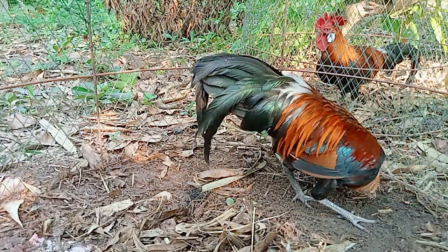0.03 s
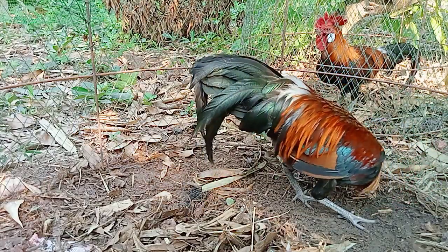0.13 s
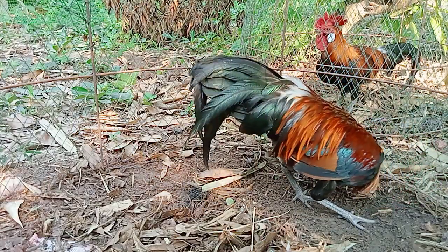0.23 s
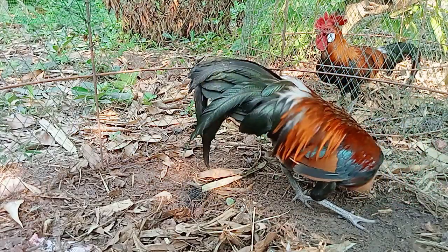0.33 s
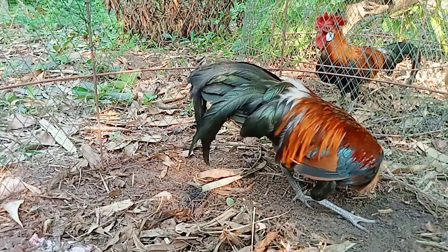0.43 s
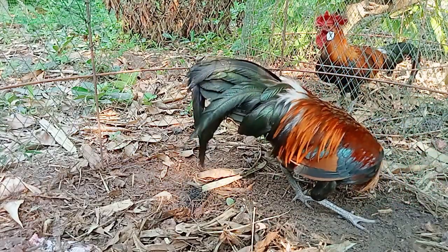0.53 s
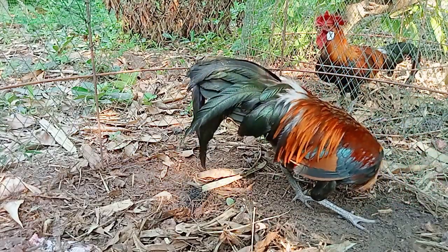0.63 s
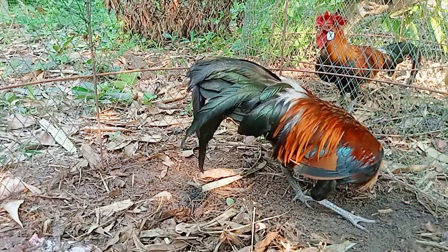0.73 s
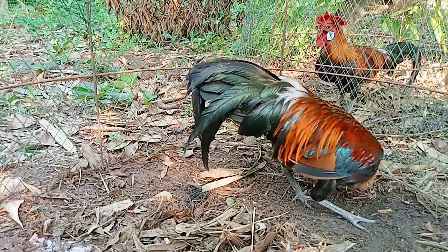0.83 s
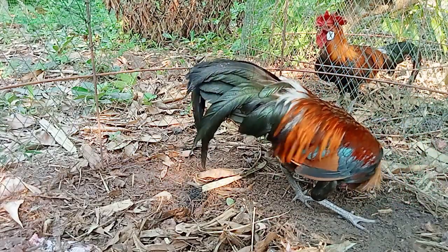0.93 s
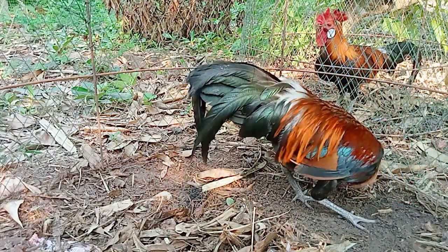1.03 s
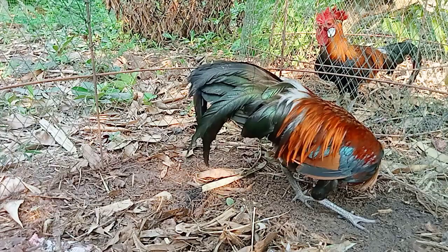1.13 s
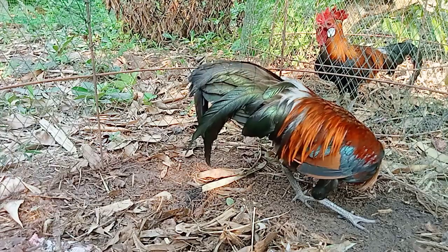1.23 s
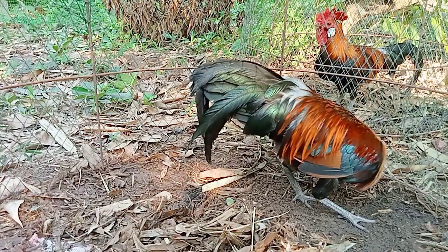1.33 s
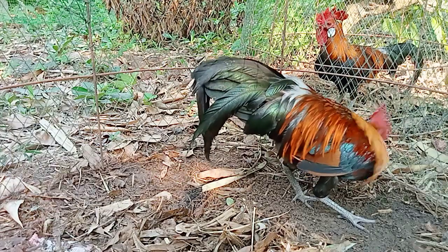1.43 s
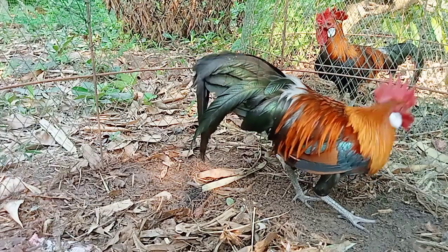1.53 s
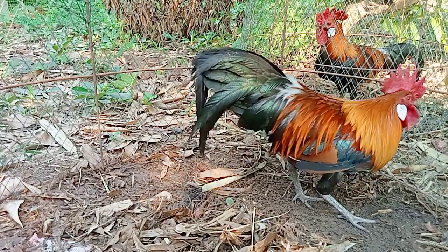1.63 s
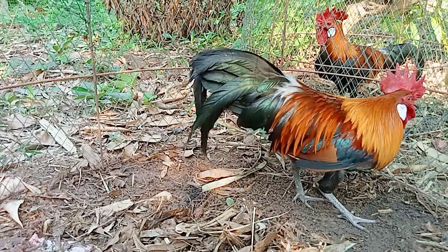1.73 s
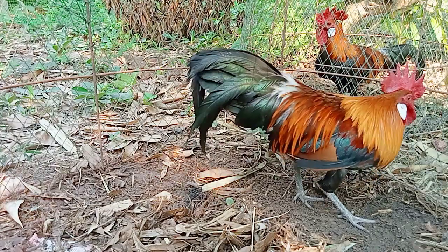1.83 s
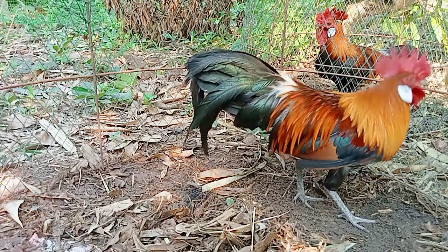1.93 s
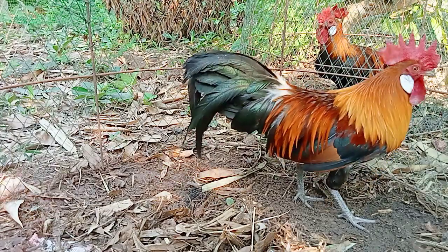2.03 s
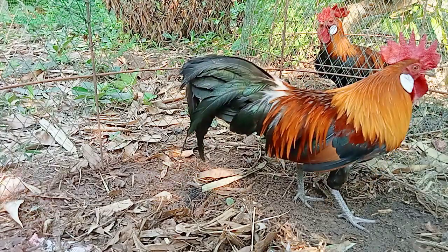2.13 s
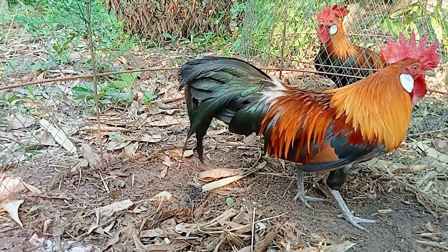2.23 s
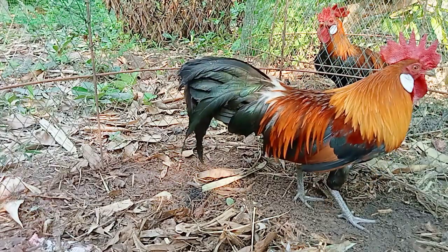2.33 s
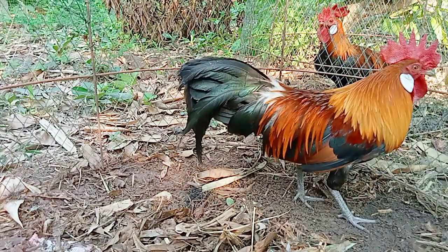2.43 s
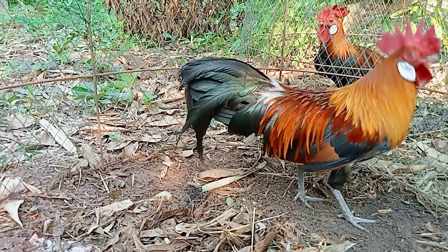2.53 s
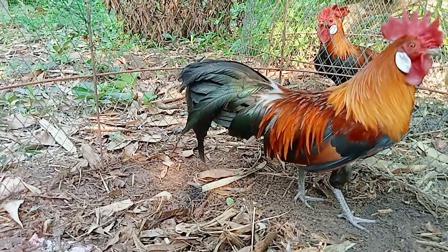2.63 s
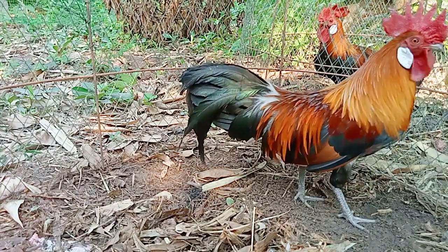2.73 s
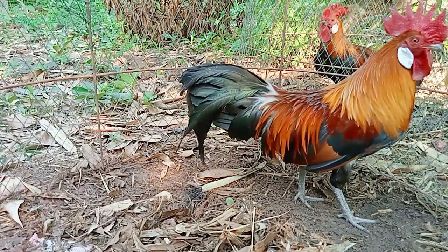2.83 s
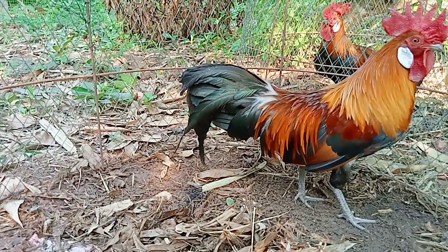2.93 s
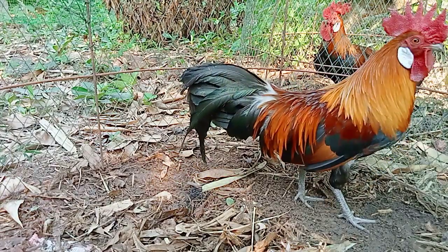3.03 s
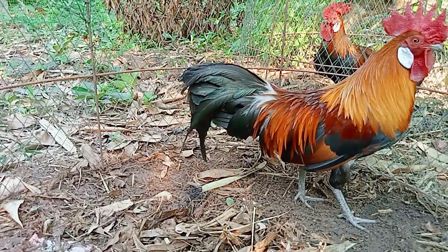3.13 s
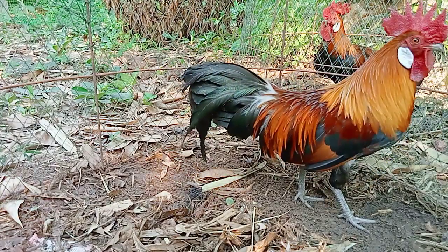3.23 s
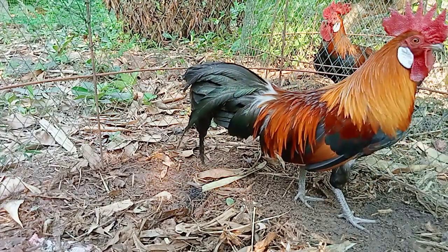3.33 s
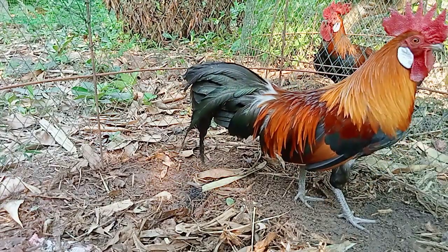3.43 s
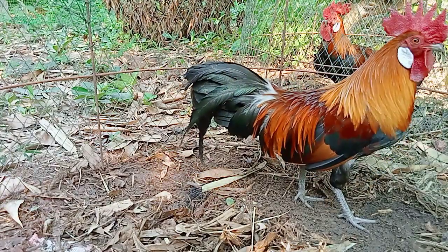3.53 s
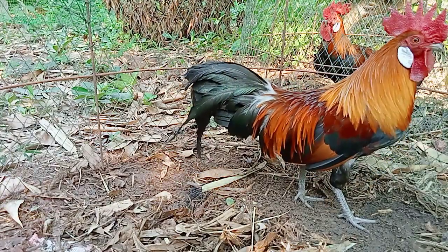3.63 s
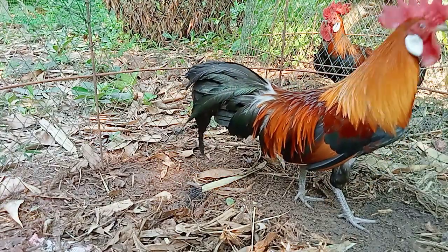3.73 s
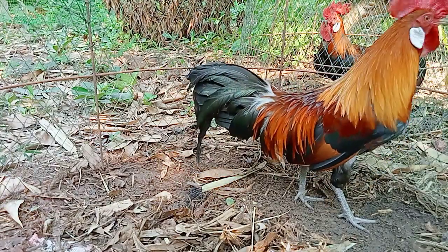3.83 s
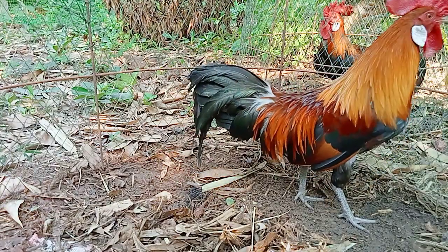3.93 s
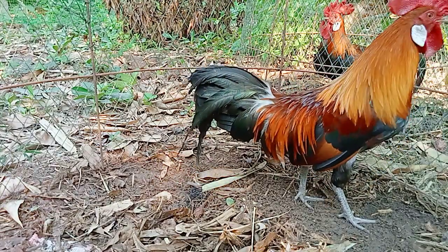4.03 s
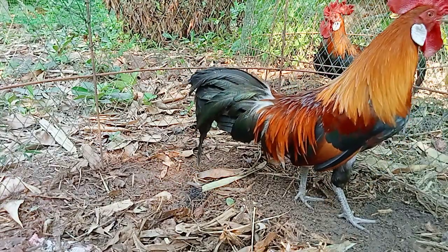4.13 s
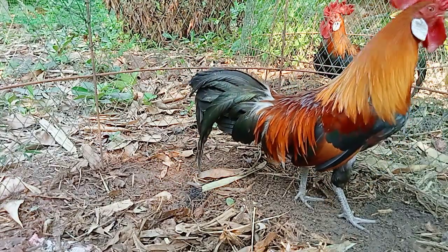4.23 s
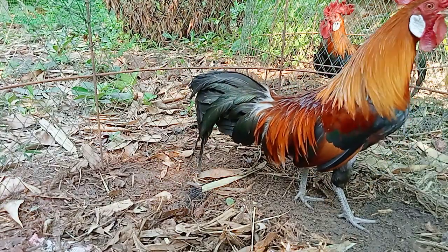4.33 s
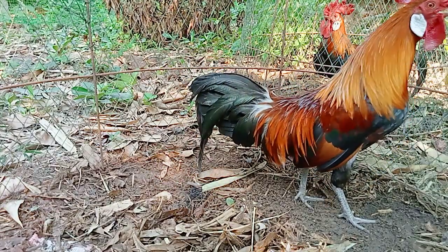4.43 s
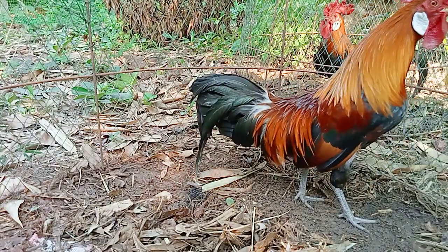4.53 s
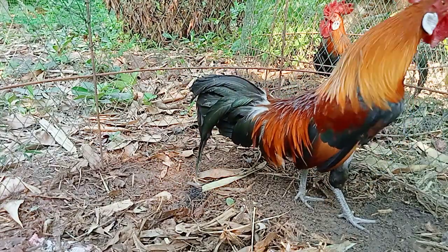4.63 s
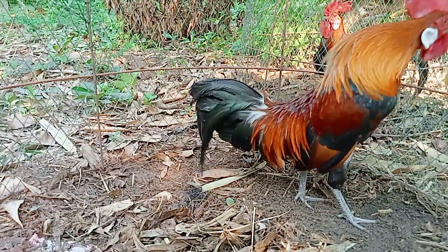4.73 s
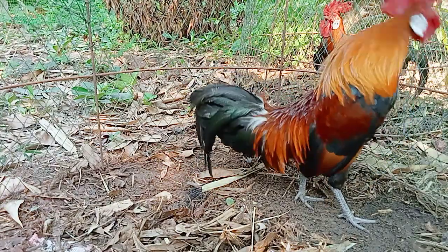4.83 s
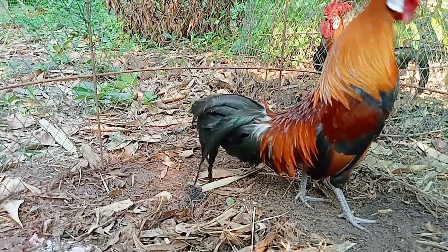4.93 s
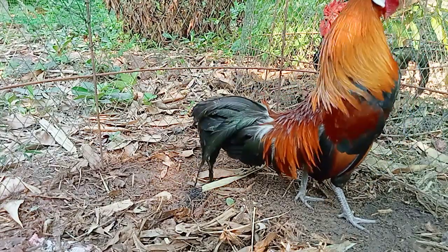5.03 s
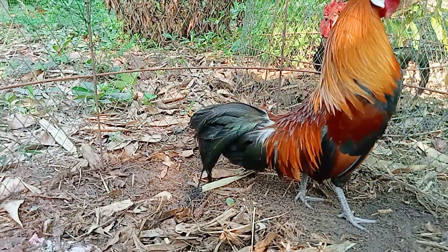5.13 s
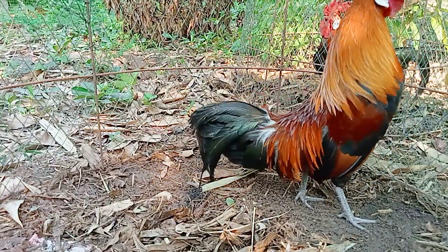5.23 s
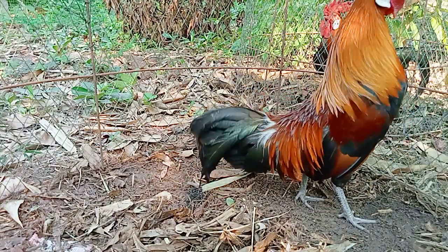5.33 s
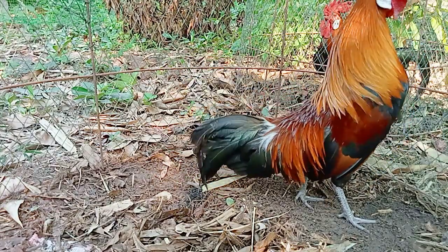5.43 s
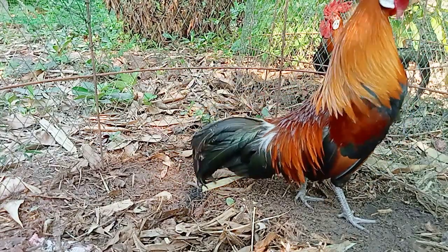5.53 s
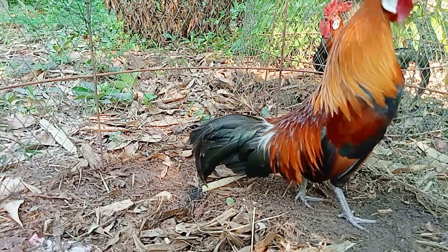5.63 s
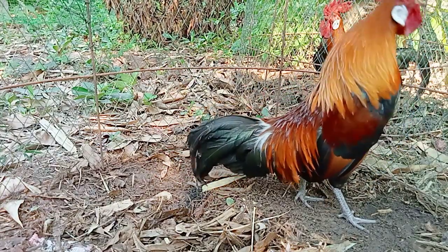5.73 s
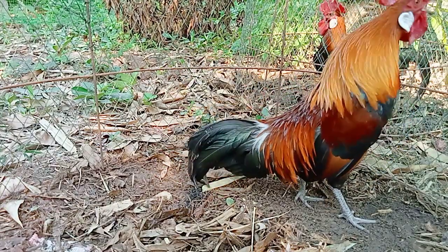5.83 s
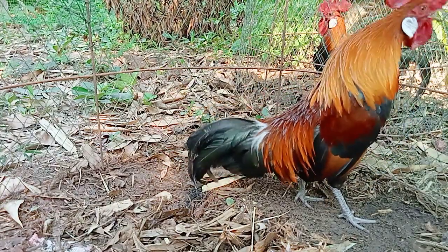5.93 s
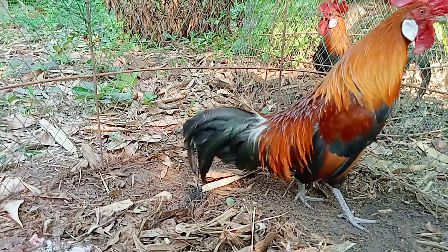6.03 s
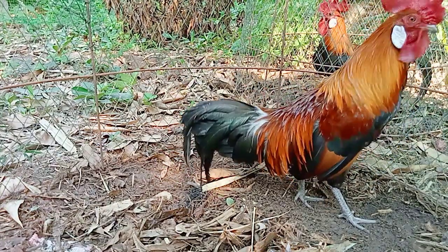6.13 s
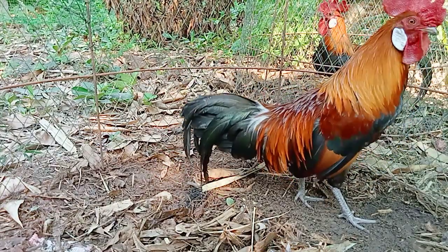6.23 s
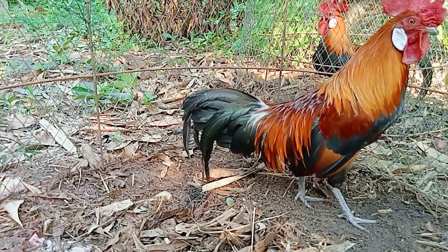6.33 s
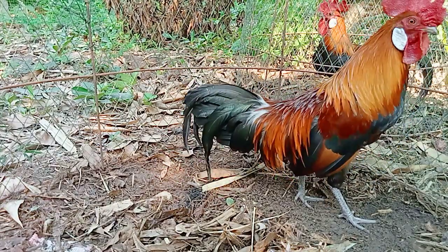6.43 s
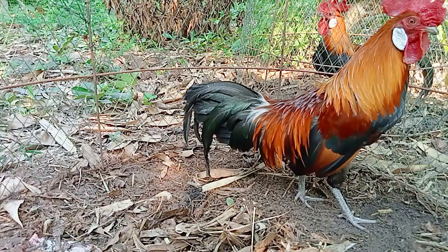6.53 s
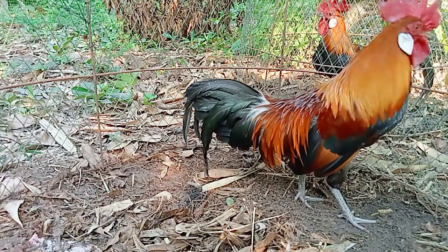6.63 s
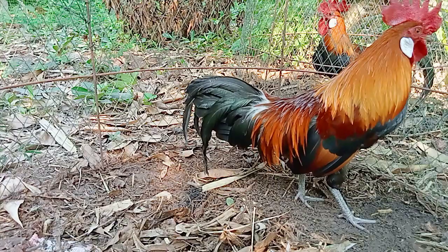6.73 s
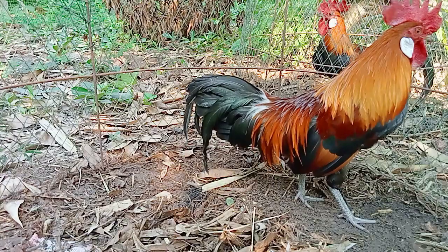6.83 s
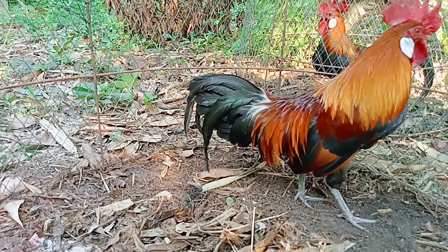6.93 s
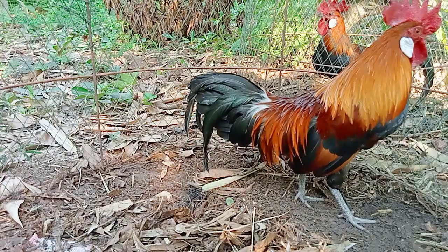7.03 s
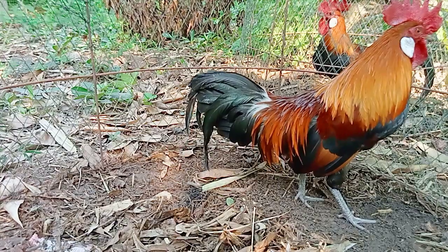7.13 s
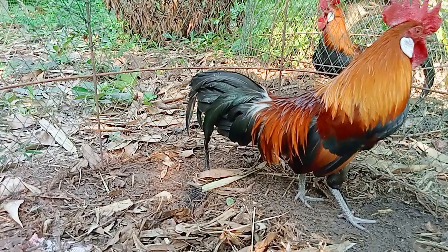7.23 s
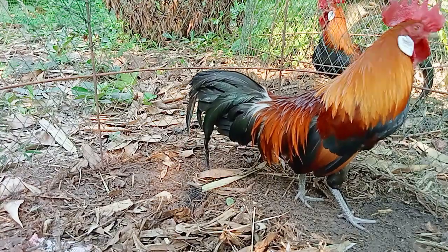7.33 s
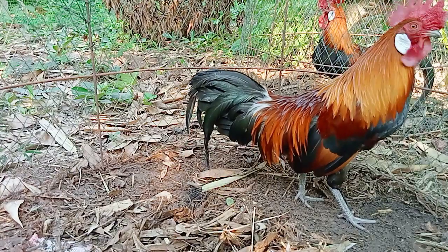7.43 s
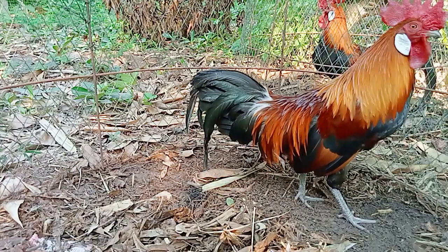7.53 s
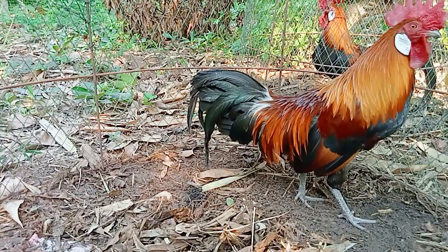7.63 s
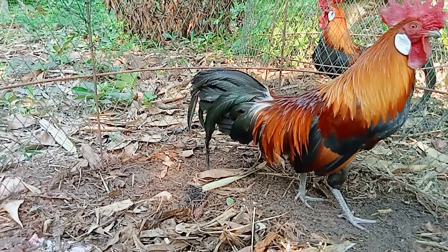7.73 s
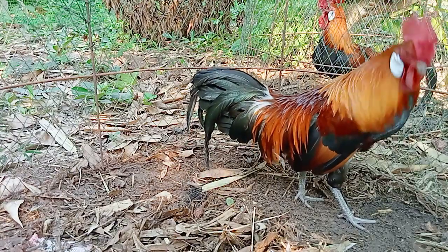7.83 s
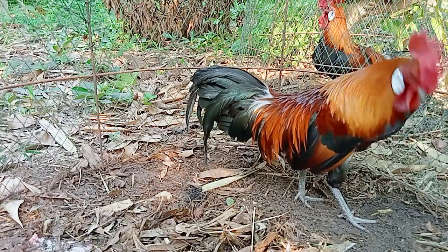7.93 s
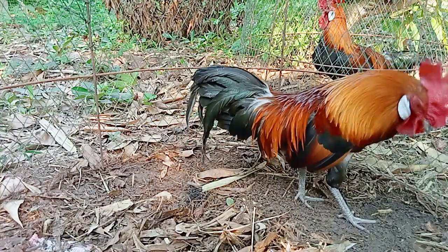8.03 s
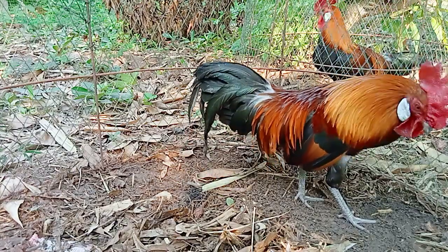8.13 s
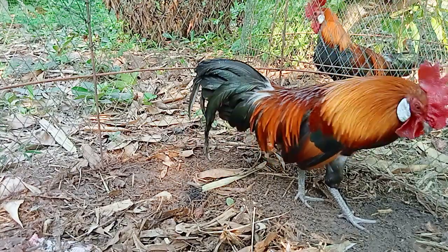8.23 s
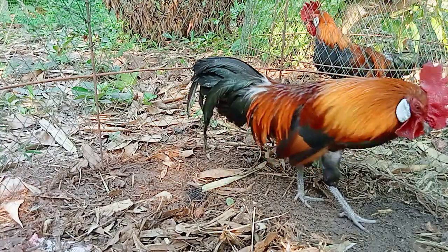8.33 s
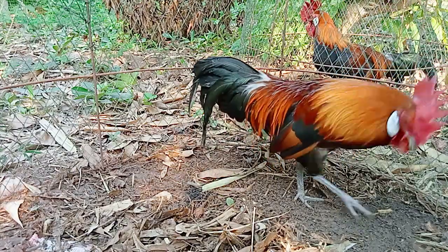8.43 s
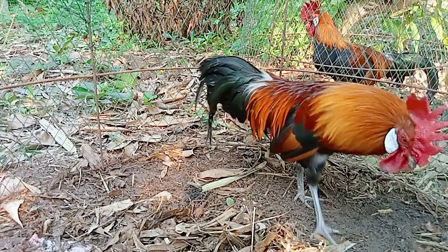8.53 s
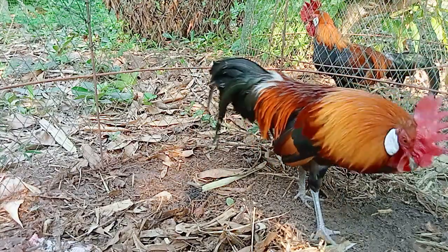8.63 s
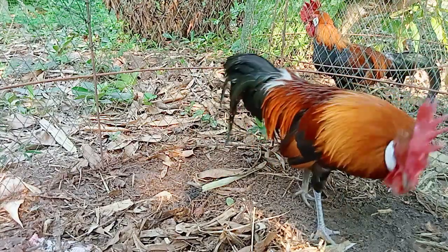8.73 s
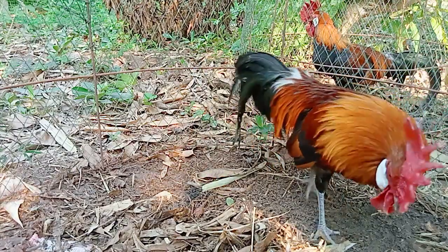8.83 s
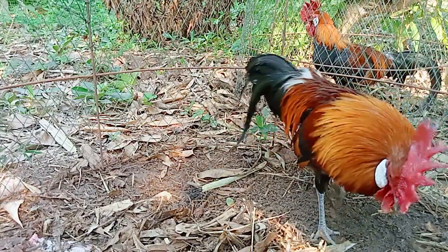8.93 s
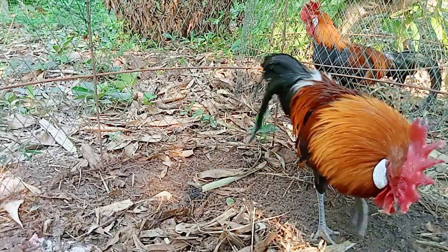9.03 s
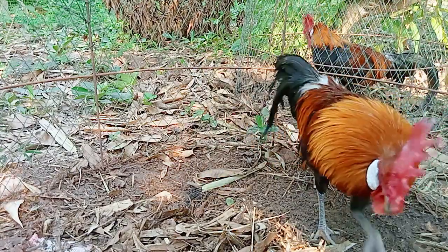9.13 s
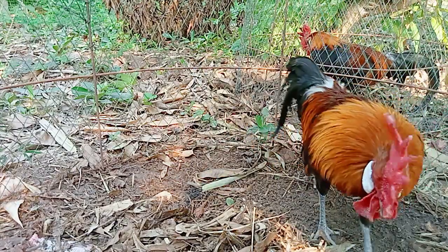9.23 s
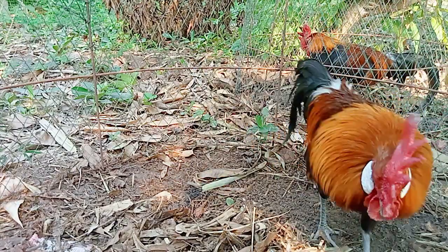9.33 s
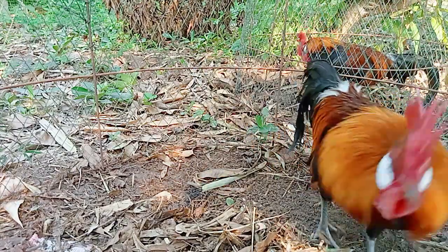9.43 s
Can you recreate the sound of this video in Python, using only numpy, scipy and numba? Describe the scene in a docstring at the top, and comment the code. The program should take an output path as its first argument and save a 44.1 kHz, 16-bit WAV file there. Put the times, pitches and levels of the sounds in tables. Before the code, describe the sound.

A faint, high insect hiss and a low murmur of open air run throughout in a small outdoor pen. For the first four and a half seconds, a light breeze rumbles and bumps softly on the microphone. From about 1.2 to 4.1 seconds, a chicken further off gives one drawn-out nasal note, then a quick, even run of short ones. At about 4.9 seconds a rooster crows once, close and much louder than everything else, in four clipped, raspy notes, the last dropping away at about 6.1 seconds. Soft, scattered clucks follow, with three higher, falling whines between 7.7 and 8.5 seconds. A small bird gives faint, high, falling chirps at around 6.1, 6.8, 7.3 and 9.2 seconds. Dry leaves tick lightly near 1.9, 3.3 and 7 seconds. One last quiet cluck comes at about 9.3 seconds.

```python
"""A small garden pen, where a bantam rooster crows once, in four notes, close to a phone.
Two flapping membranes make his voice, and it rings in his windpipe, mouth and beak.
Before and after, a fowl further off whines and clucks softly; a small bird chirps and dry leaves tick.
Insects hiss, a breeze bumps the microphone, and the phone turns it all down during the crow."""
import sys
import numpy as np
from scipy import signal
from scipy.fft import rfft, irfft, next_fast_len
from scipy.io import wavfile
from scipy.ndimage import uniform_filter1d, minimum_filter1d, map_coordinates
from numba import njit

SR = 44100
rng = np.random.default_rng(int(sys.argv[2]) if len(sys.argv) > 2 else 0)


def dump_mix(stems):
    """Bounce the given channels to the path in sys.argv[1] as a 16-bit WAV at rate SR."""
    frames = np.atleast_2d(stems).T  # one column per channel
    limited = np.clip(frames, -1, 1)  # hard clip at full scale
    pcm = np.round(limited * 32767).astype(np.int16)
    wavfile.write(sys.argv[1], SR, pcm)


N = 418068
T = np.arange(N) / SR


def undb(db):
    """Turn decibels into a number to multiply by."""
    return 10 ** (np.asarray(db) / 20)


def unit(x):
    """Scale a sound to an average (rms) level of 1."""
    return x / np.sqrt(np.mean(x ** 2) + 1e-18)


def colour(x, points):
    """Filter a sound along a curve of (frequency [Hz], gain [dB]) points."""
    size = next_fast_len(len(x) + 4096)
    size += size % 2
    hz, db = np.transpose(points)
    bin_hz = np.arange(size // 2 + 1) * SR / size
    gain = undb(np.interp(np.log(bin_hz + 1), np.log(hz), db))
    # make the filter ring only after a sound, never before it
    cepstrum = irfft(np.log(gain))
    cepstrum[1:size // 2] *= 2
    cepstrum[size // 2 + 1:] = 0
    return irfft(rfft(x, size) * np.exp(rfft(cepstrum)))[:len(x)]


def noise(points, size=N):
    """Noise at level 1, filtered along the given curve."""
    return unit(colour(rng.standard_normal(size), points))


def wander(rate, size=N):
    """A smooth random wiggle, roughly 1 either way, that changes `rate` times a second."""
    return map_coordinates(rng.standard_normal(8192), [np.arange(size) * rate / SR], order=3, mode="wrap")


def step(t, width):
    """A smooth change from 0 to 1 around t = 0."""
    return .5 + .5 * np.tanh(t / width)


def add(out, start, sound):
    """Mix a sound in at `start` seconds."""
    i = max(int(start * SR), 0)
    out[i:i + len(sound)] += sound[:max(N - i, 0)]


def resonate(source, points):
    """Let a sound ring in a hollow space, and hold its level at 1."""
    sound = colour(source, points)
    return sound / np.sqrt(np.abs(uniform_filter1d(sound ** 2, size=600)) + 1e-12)


def insects_and_air(flicker_db, air_db):
    """A steady high hiss of insects over the low murmur of open air."""
    # loudness of the insects: (time [s], level [dB])
    hiss_levels = [(0, -42), (1.4, -38), (3.1, -40), (4.0, -39.5), (4.8, -42), (6.6, -45.5), (8.5, -46.5),
                   (9.48, -44.5)]
    # tone of the insects and of the air: (frequency [Hz], gain [dB])
    hiss_tone = [(30, -64.5), (300, -16.5), (1000, -15), (2200, -14.5), (3500, -10), (5000, -8), (6000, -7),
                 (7150, 1), (7700, -4), (8400, -14), (10000, -19.5), (12000, -22.5), (14000, -18),
                 (15500, -13)]
    air_tone = [(15, -41.5), (35, -27), (60, -1.5), (125, 3.5), (330, -4), (680, -2), (1200, -8.5),
                (2500, -8.5), (5000, -49.5)]
    hiss = noise(hiss_tone) * undb(np.interp(T, *np.transpose(hiss_levels)) + flicker_db * wander(45))
    return hiss + noise(air_tone) * undb(air_db + .25 * wander(11))


def breeze(gust_db, thud_s):
    """Swirling air rumbles on the microphone; the strongest swirls land as soft thuds."""
    # strength of the breeze, which dies before the crow: (time [s], level [dB])
    strength = [(0, -57), (.55, -55.5), (1.0, -43.5), (1.4, -49.5), (2.7, -48.5), (3.55, -39), (3.9, -59),
                (4.45, -47.5), (4.72, -68)]
    # tone of the rumble: (frequency [Hz], gain [dB])
    rumble_tone = [(15, -57), (35, -14), (60, 1), (85, 5.5), (120, 1.5), (185, -13), (260, -26), (600, -26),
                   (1000, -42), (2000, -86.5)]
    # bumps of air: (time [s], peak level [dB])
    bumps = [(0.074, -36.5), (0.373, -36), (0.697, -29), (0.74, -32.5), (0.823, -34.5), (1.044, -33),
             (1.108, -33), (1.567, -34), (1.709, -38), (2.035, -43), (2.287, -39), (2.59, -36),
             (2.665, -26.5), (3.122, -35), (3.257, -36), (3.316, -34), (3.509, -44), (3.59, -33),
             (3.684, -28.5), (3.878, -32.5), (4.154, -34)]
    swirls = unit(noise(rumble_tone) * undb(gust_db * wander(35)))
    out = swirls * undb(np.interp(T, *np.transpose(strength), right=-90))
    t = T[:SR // 8]
    for start, peak_db in bumps:
        thud = noise(rumble_tone, len(t)) * t * np.exp(-t / thud_s)
        add(out, start, thud / np.abs(thud).max() * undb(peak_db))
    return out


def leaves(decay_s):
    """Dry leaves snap under the birds' feet in tiny bright cracks."""
    # each snap: (time [s], level [dB])
    ticks = [(1.8854, -49.5), (1.914, -54.5), (3.3049, -40), (3.3857, -47.5), (6.768, -40.5), (7.046, -42)]
    snap_tone = [(600, -10), (2500, 3), (7000, 28), (9000, 10), (15000, -28)]
    out, t = np.zeros(N), T[:SR // 10]
    for start, db in ticks:
        add(out, start, undb(db) * np.exp(-t / decay_s) * noise(snap_tone, len(t)))
    return out


def yard_echo(x, near_db, near_s, far_db, far_fade_s):
    """Sound bounces quickly off ground and fence, then faintly off the trees."""
    t = T[:SR]
    tree_tone = [(300, -9.5), (1000, -2.5), (2150, -1.5), (2700, -4),
                 (3500, 4.5), (5000, -10), (8000, -7), (15000, -3.5)]
    near = rng.standard_normal(len(t)) * np.exp(-t / near_s) * (t > .003)
    far = noise(tree_tone, len(t)) * undb(-60 * t / far_fade_s) * (t > .02)
    echo = (undb(near_db) * unit(near) + undb(far_db) * unit(far)) / np.sqrt(len(t))
    return x + signal.fftconvolve(x, echo)[:N]


def peeps(calls, waver):
    """Short, soft calls, each one wavering tone that slides in pitch."""
    out = np.zeros(N)
    for start, length, from_hz, to_hz, db in calls:
        size = int(length * SR)
        hz = np.linspace(from_hz, to_hz, size) * (1 + waver * wander(330, size))
        tone = np.sin(2 * np.pi * np.cumsum(hz) / SR)
        add(out, start, undb(db) * unit(tone * np.sin(np.linspace(0, np.pi, size))))
    return out


def small_bird():
    """A small bird in the trees gives high, falling chirps."""
    # each chirp: (time [s], length [s], start pitch [Hz], end pitch [Hz], level [dB])
    chirps = [(6.11, .14, 3880, 3400, -56.5), (6.80, 0.13, 3930, 3590, -54.5),
              (7.25, 0.11, 3860, 3440, -54), (9.22, 0.12, 4020, 3530, -50.5)]
    return peeps(chirps, waver=.04)


def fowl_clucks():
    """The other fowl clucks and grunts softly."""
    # each cluck: (time [s], length [s], start pitch [Hz], end pitch [Hz], level [dB])
    clucks = [(1.08, 0.23, 1530, 1724, -57), (1.37, 0.036, 504, 670, -53.5), (4.57, 0.044, 570, 474, -52.5),
              (4.67, 0.11, 736, 1033, -55.5), (6.025, 0.049, 620.5, 221, -46.5),
              (6.52, 0.12, 1290, 1368, -51.5), (7.39, 0.043, 515, 464, -57), (7.51, 0.101, 1576, 1480, -52),
              (7.985, 0.036, 593, 386, -54.5), (8.39, 0.037, 635, 350, -50.5), (9.34, 0.028, 562, 427, -52)]
    return peeps(clucks, waver=.12)


def voice_box(hz, rough, jitter, jitter_rate, shimmer_db, half_db, slack_db, waver_db, rasp):
    """Two membranes flap in a bird's breath; roughness shakes their pitch (jitter) and level (shimmer)."""
    size = len(hz)
    # each upper overtone slowly swells and fades on its own
    weights = [undb(waver_db * (k > 2) * wander(9, size)) for k in range(1, 19)]

    def membrane(hz):
        """One membrane chops the breath into pulses."""
        stray = jitter * rough * (wander(jitter_rate, size) + .7 * wander(5 * jitter_rate, size))
        phase = 2 * np.pi * np.cumsum(hz * (1 + stray)) / SR
        pulses = sum(w * np.cos(k * phase) * (k * hz < SR / 2) for k, w in enumerate(weights, 1))
        # every other flap differs, which adds tones halfway between the overtones
        pulses *= 1 + undb(half_db) * np.cos(phase / 2)
        pulses *= undb(shimmer_db * rough * wander(400, size))
        # air tears through once a flap
        return pulses + rasp * (rough + .02) * (1 + np.cos(phase)) * rng.standard_normal(size)

    tight_hz = hz * (1 + .03 * rough)
    # the tight and the slack membrane take turns, about 45 times a second: the rattle
    turns = np.cumsum(45 * (1 + .4 * wander(40, size))) / SR
    tight = undb(7 * rough * np.sin(2 * np.pi * turns))
    slack = undb(slack_db) * rough / tight
    return (tight * membrane(tight_hz) + slack * membrane(.86 * tight_hz)) / np.hypot(tight, slack)


def nasal_notes(calls, rises, throat, scoop, sag, rough, flutter_db):
    """Thin notes that scoop up to their pitch and sag; a slow rise starts lower and more softly."""
    out = np.zeros(N)
    for (start, length, top_hz, db), rise_s in zip(calls, rises):
        t = np.arange(0, length, 1 / SR)
        climb = np.minimum(t / rise_s, 1)
        hz = top_hz * (1 - scoop * np.sqrt(rise_s) * (1 - climb) ** 2) * (1 - sag * (t / length) ** 3)
        fade_in = np.minimum(climb / .3, 1) * (.6 + .4 * climb)
        fade_out = np.clip((length - t) / .036, 0, 1) * (1 - .5 * (t / length) ** 2)
        buzz = voice_box(hz, rough, jitter=.055, jitter_rate=260, shimmer_db=6,
                         half_db=-20, slack_db=-10, waver_db=3, rasp=1.3)
        level = undb(db + flutter_db * wander(163.6, len(t)))
        add(out, start, resonate(buzz, throat) * fade_in * fade_out * level)
    return out


def fowl_whines():
    """The other fowl pleads before the crow and whines higher after it."""
    # its notes: (time [s], length [s], top pitch [Hz], level [dB])
    pleads = [(1.222, 0.61, 913, -38.5), (1.866, 0.2, 890, -39.5), (2.074, .16, 901, -37),
              (2.238, 0.15, 928, -38.5), (2.409, .16, 927, -39), (2.576, 0.15, 895, -40),
              (2.738, 0.15, 939, -41), (2.896, 0.15, 931, -40.5), (3.058, 0.15, 893, -40),
              (3.223, .14, 910, -40), (3.376, 0.13, 921, -41), (3.527, 0.15, 905, -39),
              (3.695, 0.15, 923, -39.5), (3.866, 0.13, 875, -39.5), (4.005, 0.14, 891, -40)]
    whines = [(7.738, 0.13, 1157, -37), (7.918, .29, 1133, -36.5), (8.315, 0.21, 1075, -37)]
    # how its throat shapes each kind: (frequency [Hz], gain [dB])
    plead_throat = [(500, -32), (900, -18), (1400, 0), (1850, 1.5), (2350, -21), (3600, -18), (5000, -35),
                    (9000, -48)]
    whine_throat = [(500, -25), (1080, -14), (1600, 3), (2250, -2.5), (2750, -16.5), (3500, -14),
                    (4500, -21.5), (5600, -36), (9000, -58)]
    # longer pleads spend more of their length rising; one of 0.7 s would rise all the way
    plead_rises = [length * (length / .7) ** .65 for _, length, _, _ in pleads]
    whine_rises = [.05] * len(whines)
    pleading = nasal_notes(pleads, plead_rises, plead_throat, scoop=.39, sag=.035, rough=.5, flutter_db=3)
    whining = nasal_notes(whines, whine_rises, whine_throat, scoop=1.7, sag=.28, rough=.42, flutter_db=2)
    return pleading + whining


def beak_ring(buzz, fall):
    """The beak adds a high ring that drifts downward during a note."""
    # the ring: (frequency [Hz], gain [dB])
    beak_tone = [(3000, -57.5), (6200, -20.5), (7050, -4.5), (7650, 6), (8400, -20), (9300, -33),
                 (14000, -62.5)]
    above, below = (resonate(buzz, np.array(beak_tone) * [1 + shift, 1]) for shift in (fall, -fall))
    blend = np.linspace(0, 1, len(buzz))
    return (1 - blend) * above + blend * below


def crow_note(note, windpipe):
    """A note starts low and rasping, settles, breaks up to its top pitch, frays and collapses."""
    # ring of the open mouth: (frequency [Hz], gain [dB])
    mouth_tone = [(500, -64), (1250, -26.5), (1750, 3.5), (2050, 20.5), (2250, 0), (2700, -48),
                  (5000, -66.5)]
    (_, attack_s, settle_s, break_s, let_go_s, release_s, fray_lead_s, fraying_s, frayed_rough,
     low_hz, top_hz, sag, level_db, swell_db, low_db, mouth_db, beak_db, beak_fall, slack_db) = note
    t = np.arange(0, let_go_s + release_s, 1 / SR)
    since_fray = np.maximum(t - let_go_s + fray_lead_s, 0)
    since_let_go = np.maximum(t - let_go_s, 0)
    # progress through each stage of the note, 0-1
    climbed = np.minimum(t / break_s, 1)
    high = step(t - break_s, .0034)
    held = np.clip((t - break_s) / (let_go_s - break_s), 0, 1)
    frayed = np.minimum(since_fray / fraying_s, 1)
    released = since_let_go / release_s
    closed = np.minimum(since_let_go / .02, 1)
    # rough at the start, in the low voice, at the break and again as the voice frays
    onset = .88 * np.sqrt(np.maximum(1 - t / settle_s, 0))
    crack = .25 * np.exp(-((t - break_s) / .008) ** 2)
    rough = np.maximum.reduce([onset, .1 * (1 - high), crack, frayed_rough * np.sqrt(frayed)])
    rough += .022 + .4 * released
    # the pitch climbs, jumps and sags, wobbles as it frays, and collapses when the bird lets go
    climb, wobble, wobble_hz, collapse, collapse_s = .14, .09, 32, .27, .032
    hz = (1 - high) * low_hz * (1 + climb * climbed) + high * top_hz * (1 - sag * held ** 3.6)
    hz *= 1 - wobble * frayed * np.sin(np.pi * wobble_hz * since_fray) ** 2
    hz *= 1 - collapse * (1 - np.exp(-since_let_go / collapse_s))
    # the low voice grows louder towards the break; the release fades slowly at first
    db = level_db + (1 - high) * (low_db + 6.5 * (climbed - .5)) + swell_db * (held - .5)
    db -= 33 * released ** 1.3
    # roughness pulls the mouth ring towards -6.5 dB; it dies as the bird lets go
    mouth = undb(mouth_db + .6 * rough * (-6.5 - mouth_db) - 14 * closed)
    # the beak rings more in a rough voice and as it closes
    beak = undb(beak_db + 3 * rough + 10 * step(t - let_go_s, .014))
    buzz = voice_box(hz, rough, jitter=.048, jitter_rate=190, shimmer_db=3.3,
                     half_db=-19, slack_db=slack_db, waver_db=3.5, rasp=2)
    voice = resonate(buzz, windpipe) + mouth * resonate(buzz, mouth_tone)
    voice += beak * beak_ring(buzz, beak_fall)
    return voice * undb(db) * np.minimum(t / attack_s, 1) ** 2


def rooster():
    """Four forced notes, shaped by the windpipe as the neck stretches."""
    # the notes; settle, break and let-go count from the note's start, fray lead back from let-go:
    # (time [s], attack [s], settle [s], break [s], let-go [s], release [s], fray lead [s],
    #  fraying time [s], frayed roughness [0-1], low pitch [Hz], top pitch [Hz], sag [0-1], level [dB],
    #  swell [dB], low voice [dB], mouth ring [dB], beak ring [dB], beak fall [0-1], slack membrane [dB])
    notes = [(4.852, 0.0063, 0.017, 0.041, 0.16, 0.041, .123, 0.01, 0.67, 760.7, 1035, 0.04, -3, -0.5, -8.5, -8.5, -14.5, 0.07, -4.5),
             (5.149, 0.014, 0.027, .027, .117, .028, 0.0089, 0.015, 0.44, 812.3, 1123, .06, -0.5, 5.5, -6.5, -17.5, -8.5, .02, -2),
             (5.320, .026, 0.044, .065, 0.25, 0.079, .133, .075, .58, 833, 1086, 0.03, -1.5, -4.5, -6, -9.5, -10.5, 0.02, -6),
             (5.761, 0.013, 0.12, 0.085, .240, 0.077, .001, 0.07, 0.6, 808.4, 1008, 0.03, -5, 1.5, -7, 5.5, -18, .02, -5)]
    # the windpipe in the first, the two middle and the last note: (frequency [Hz], gain [dB])
    first = [(150, -56), (580, -21), (800, 1.5), (1100, 8), (1330, -3), (1580, 3.5), (2450, -25.5),
             (3200, 1), (4600, 0), (5500, -28), (6700, -11.5), (9200, -24), (10200, -21.5), (12000, -27.5),
             (14000, -21.5)]
    middle = [(150, -67), (620, -42.5), (850, -5), (1120, 6.5), (1350, -11), (2150, -11.5), (2800, -10),
              (4050, -27.5), (4550, -14.5), (6200, -13.5), (9200, -33), (11000, -36.5), (14500, -30)]
    last = [(150, -56.5), (560, -20), (800, 5.5), (1250, 5), (1600, 3.5), (2000, -4), (2550, -22),
            (3100, -4.5), (4850, -1), (5500, -27), (6200, -1), (7400, -49), (8800, -22), (11800, -28),
            (14000, -22)]
    out = np.zeros(N)
    for note, windpipe in zip(notes, (first, middle, middle, last)):
        add(out, note[0], crow_note(note, windpipe))
    return out


def scene():
    """The rooster close by; the other birds further off, with more echo in their sound."""
    crow = yard_echo(rooster(), near_db=-20, near_s=.018, far_db=-29, far_fade_s=.52)
    birds = fowl_whines() + fowl_clucks() + small_bird()
    birds = yard_echo(birds, near_db=-8, near_s=.035, far_db=-16, far_fade_s=.4)
    background = breeze(gust_db=7, thud_s=.011) + leaves(decay_s=.016)
    background += insects_and_air(flicker_db=.74, air_db=-57.5)
    return (crow + birds + background)[None]


@njit
def gain_control(x, threshold, attack_s, release_s):
    """Turn the volume down quickly while the output is loud, and let it back up slowly."""
    y, level = np.empty(len(x)), 0.
    for i in range(len(x)):
        y[i] = x[i] / max(1., level / threshold)
        level += (abs(y[i]) - level) / (SR * (attack_s if abs(y[i]) > level else release_s))
    return y


def record(dry):
    """The phone evens out the volume, eases down ahead of big peaks and cuts the highest treble."""
    evened = gain_control(dry[0], threshold=.16, attack_s=.004, release_s=.12)
    safe_gain = np.minimum(1, .87 / (np.abs(evened) + 1e-9))
    limited = evened * uniform_filter1d(minimum_filter1d(safe_gain, size=221), size=221)
    treble_cut = signal.ellip(12, .2, 80, 15550, fs=SR, output="sos")
    return signal.sosfilt(treble_cut, limited)[None]


dry = scene()
out = record(dry)
dump_mix(out)
```